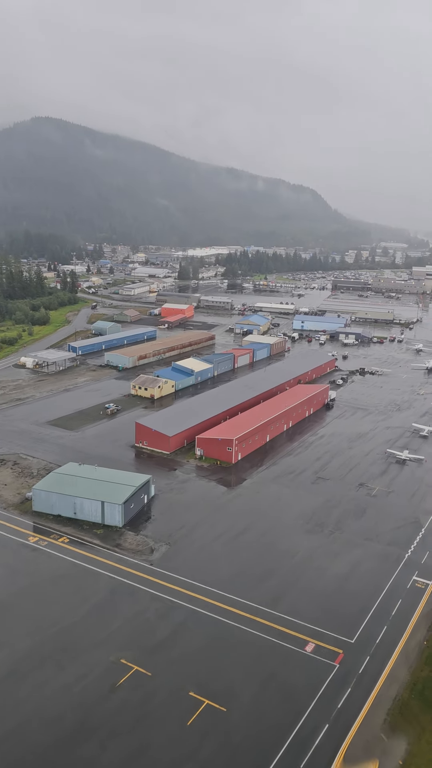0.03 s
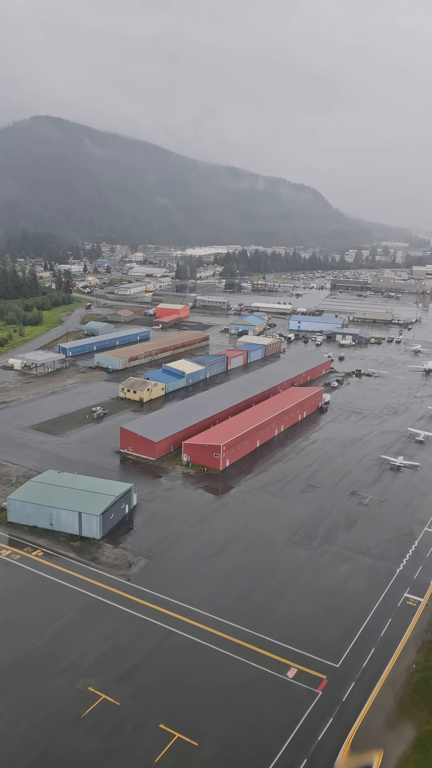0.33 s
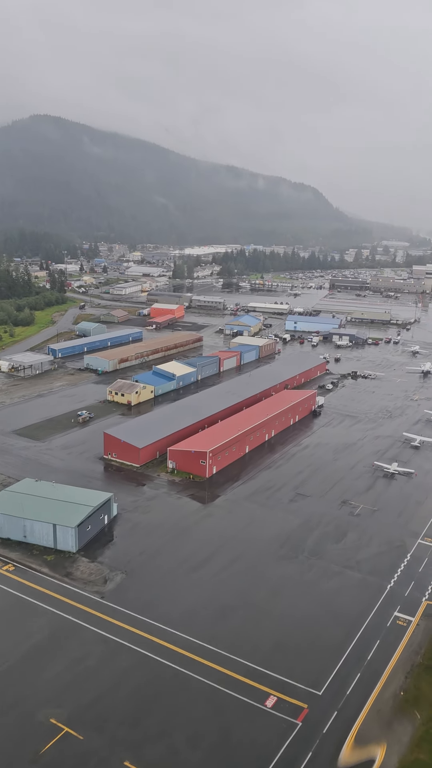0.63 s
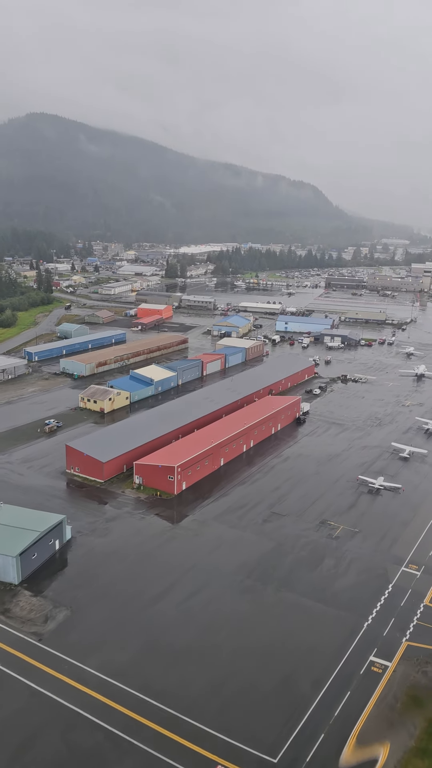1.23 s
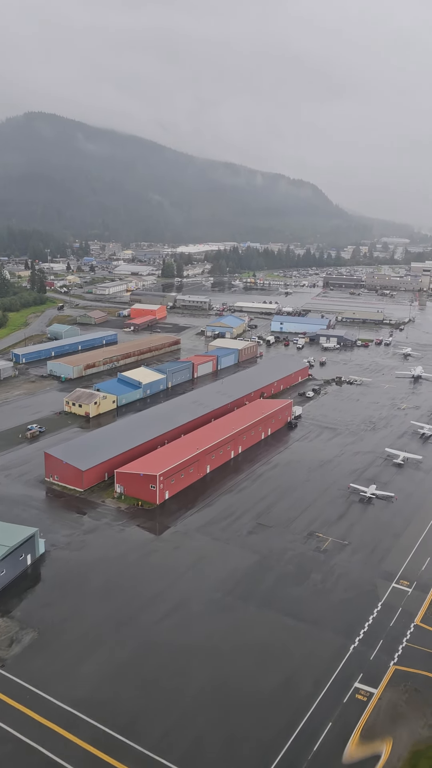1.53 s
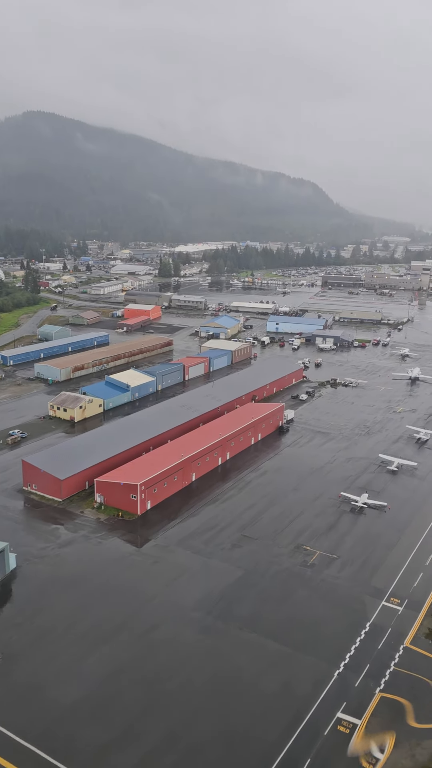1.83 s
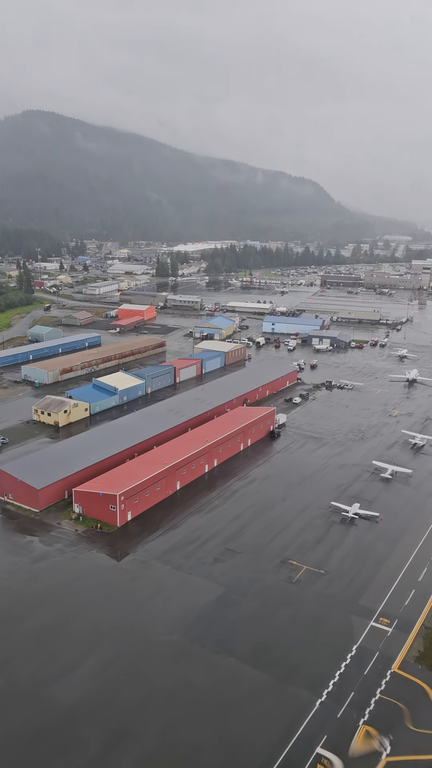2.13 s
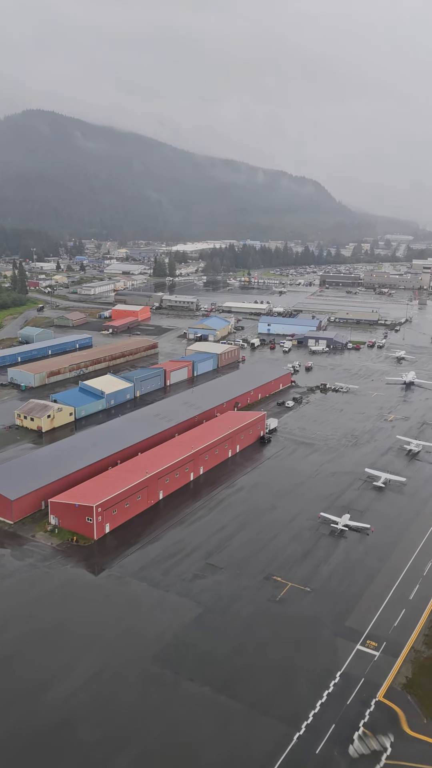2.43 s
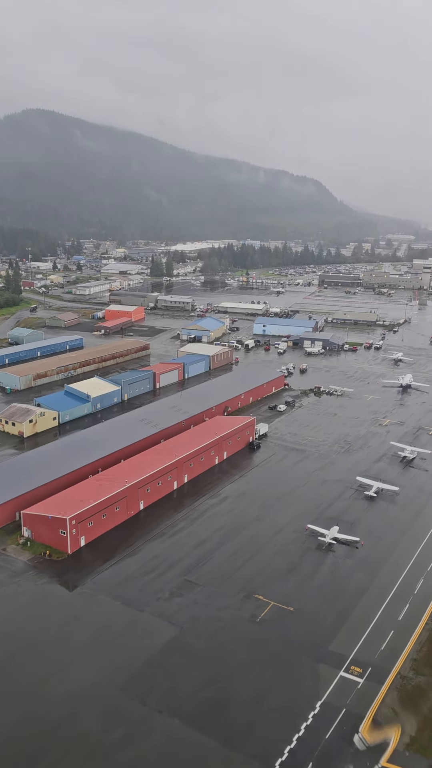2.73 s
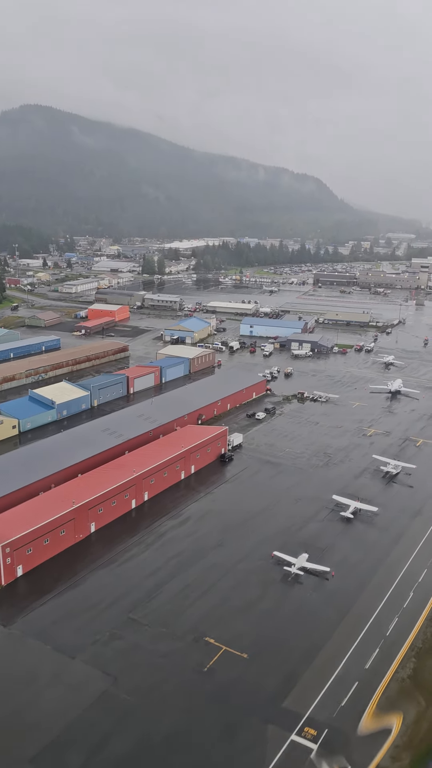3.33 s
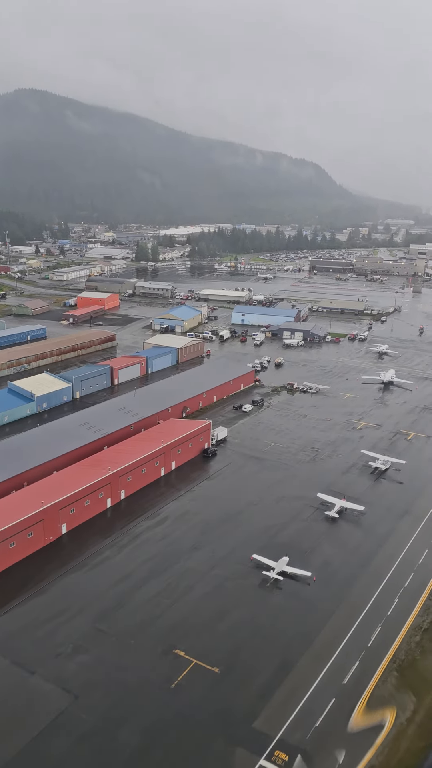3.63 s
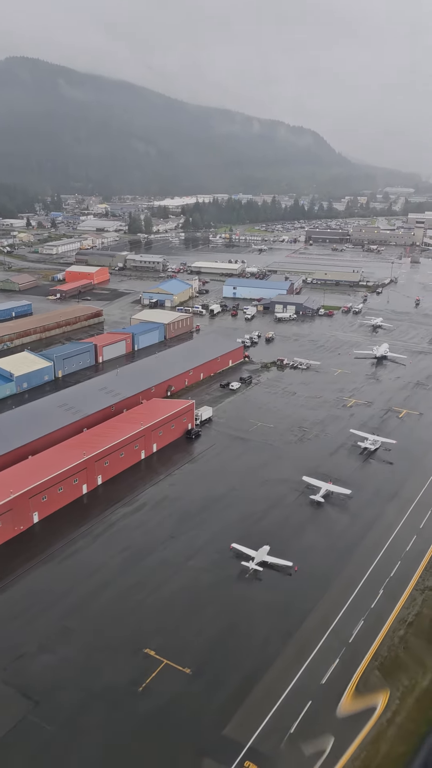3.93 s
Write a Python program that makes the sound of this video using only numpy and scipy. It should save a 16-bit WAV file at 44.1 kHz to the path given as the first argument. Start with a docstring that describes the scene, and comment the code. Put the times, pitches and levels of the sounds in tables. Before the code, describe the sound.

A helicopter heard from inside, its rotor throbbing and slapping over rumble, whine and hiss.

```python
"""Inside a helicopter cabin on a slow approach, a stereo pair of microphones at the seat.
All around, air rumbles on the hull and hisses through the cabin. The turbine whistles, the gearbox
sings and the tail rotor drones. Over it all the main rotor throbs: each passing blade slaps, now
softly, now hard, and cracks when it cuts a tip vortex."""
import sys
import numpy as np
from scipy import signal
from scipy.fft import rfft, irfft, next_fast_len
from scipy.io import wavfile
from scipy.ndimage import map_coordinates

SR = 44100
rng = np.random.default_rng(int(sys.argv[2]) if len(sys.argv) > 2 else 0)


def to_wav(s):
    """Save 16-bit WAV."""
    ch = np.atleast_2d(s).T  # columns
    pcm = np.round(np.clip(ch, -1, 1) * 32767)  # PCM
    wavfile.write(sys.argv[1], SR, pcm.astype(np.int16))


N = 176400

BLADE_HZ, FIRST_BLADE_S, TAIL_BLADE_HZ = 19.474, .0112, 68.82

# Airflow on the hull, in the cabin and at each microphone (frequency [Hz], relative density [dB])
HULL_RUMBLE = [(10, -28), (25, -22), (40, -1.5), (70, 0.5), (110, -2.5), (170, 0), (240, -4.5),
               (330, -14.5), (450, -19), (800, -31), (2000, -79)]
CABIN_AIR = [(100, 1), (280, -5), (420, -2.5), (700, -5.5), (1050, -7.5), (1320, -5.5), (1520, -9),
             (1750, -7.5), (2000, -13.5), (2230, -14), (2500, -30.5), (4000, -33)]
HISS_LEFT = [(1200, -24), (2400, -2.5), (3300, 4), (3900, 0.5), (4500, 2.5), (6600, -1.5), (7700, 2),
             (8350, 7.5), (8800, 3), (9750, 5.5), (10150, -1), (10700, -2), (11200, 1), (14500, 1),
             (15500, 3.5)]
HISS_RIGHT = [(1200, 1.5), (2400, -0.5), (3300, -1), (3900, 0), (4500, 2.5), (6000, 0.5), (7000, -10),
              (8300, -12.5), (9000, -9), (9800, -6), (10400, -2), (11500, 6), (12300, 0.5), (14500, 2.5),
              (15600, 2.5)]
# Likeness of the air noise at the two microphones (frequency [Hz], correlation [-1..1])
MIC_COHERENCE = [(200, 0.85), (500, 0.68), (1000, 0.28), (2500, 0.19)]
# Compressor speed (time [s], change [%])
COMPRESSOR_SPEED = [(0, -.6), (.3, -.22), (1.2, -.02), (1.5, .02), (2.0, -.15), (2.7, .36), (3.15, .36),
                    (3.6, 0), (4, -.1)]
# Turbine whistles, gear tones, and the main mesh with its shaft sidebands, all before their swells
# (frequency [Hz], left level [dB], right level [dB], flutter share of power [0..1])
TURBINE_TONES = [(8345, -42.5, -57.5, .45), (9860, -43, -50, .35)]
GEAR_TONES = [(648, -47, -51, .4), (700, -45, -49, .4), (908, -53, -60, .4), (1298, -41, -48, .45),
              (1514, -57, -52, .3), (1948.6, -47.5, -38, .03), (2235, -62, -52, .9), (2955, -55, -64, .8),
              (3246, -57, -53.5, .6), (3828, -53.5, -62, .7), (3900, -59, -55, .7), (4554, -51, -48.5, .65),
              (5561, -54, -54.5, .65), (6164, -58, -56, .7), (12118, -60, -56, .8)]
MESH_TONES = [(1688, -58, -47.5, .25), (1716, -40.5, -44, .08), (1744.5, -56, -43.5, .15),
              (1773, -58, -54, .4)]
# Swells of the cabin air, the gears and the main mesh (time [s], gain [dB])
AIR_SWELL = [(0, 0), (1.0, 1.5), (2.0, 0.9), (2.5, 2.2), (2.9, -0.5), (3.3, -1.5), (4, -1)]
GEAR_SWELL = [(0, 0), (1.2, 1), (2.6, 1), (3.1, -1.5), (4, -1.5)]
MESH_SWELL = [(0, -1.5), (.9, 3), (1.6, -1), (2.35, 5), (2.9, -2.5), (4, -5.5)]
# Tail rotor drone and main rotor throb (harmonic [x blade rate], level [dB])
TAIL_DRONE = [(1, -19.5), (2, -30), (3, -40.5), (4, -49.5)]
MAIN_THROB = [(1, -35), (2, -31.5), (3, -35.5), (4, -30), (5, -27), (6, -33), (7, -32.5), (9, -28),
              (11, -39), (13, -39.5), (14, -39), (21, -47.5), (26, -48)]
# Course of the slap's strength, and single vortex cracks (time [s], peak level [dB])
SLAP_LEVEL = [(0, -23.5), (.3, -17), (.6, -14), (.75, -16.5), (1.08, -20), (1.145, -13), (1.5, -15),
              (1.9, -21.5), (2.57, -24), (2.7, -13), (2.98, -9.5), (3.042, -13), (3.1, -13.5),
              (3.33, -11.5), (3.5, -16), (3.72, -15.5), (3.92, -7.5), (4, -17)]
VORTEX_CRACKS = [(0.064, -16.5), (.424, -20), (.527, -20), (.629, -17), (1.1411, -14), (1.194, -23),
                 (1.245, -21), (1.296, -22), (2.783, -17), (2.888, -15), (2.990, -14.5), (3.0414, -6),
                 (3.093, -30), (3.144, -16), (3.195, -15.5), (3.349, -15), (3.913, -22), (3.9645, -12.5)]
# Slap, crack and blade wake as heard from the seat (frequency [Hz], relative level [dB])
SLAP_COLOUR = [(30, -28), (110, -10.5), (190, -2), (245, 4), (290, 1.5), (330, -9.5), (400, -6.5),
               (460, -12.5), (520, -12.5), (800, -19), (1300, -45), (3000, -76)]
CRACK_COLOUR = [(100, -17), (350, -0.5), (650, 1.5), (950, -3), (1300, -16), (2200, -42), (6000, -80)]
WAKE_COLOUR = [(100, 2.5), (250, -4.5), (420, -5.5), (750, -1.5), (1100, -18), (2500, -58)]


def amp(db):
    """Decibels to gain."""
    return 10 ** (np.asarray(db) / 20)


def unit(x):
    """Scale to rms 1."""
    return x / np.sqrt(np.mean(x ** 2) + 1e-20)


def along(points, hz):
    """Read (frequency [Hz], value) points on a log axis."""
    f, v = np.transpose(points)
    return np.interp(np.log(hz + 1), np.log(f + 1), v)


def curve(rows):
    """Join (time [s], value) points, one value per sample."""
    return np.interp(np.arange(N) / SR, *np.transpose(rows))


def wobble(rate):
    """A smooth random curve, rate knots a second."""
    knots = rng.standard_normal(int(N * rate / SR) + 4)
    return map_coordinates(knots, [np.arange(N) * rate / SR])


def filtered(x, response):
    """Apply a frequency response to x."""
    size = next_fast_len(N + SR // 2)
    return irfft(rfft(x, size) * response(np.fft.rfftfreq(size, 1 / SR)), size)[..., :N]


def noise(spectrum):
    """Coloured noise of rms 1."""
    return unit(filtered(rng.standard_normal(N), lambda hz: amp(along(spectrum, hz))))


def wide_noise(spectrum):
    """Cabin noise, most alike at the two microphones in the bass."""
    def mid_and_side(hz):
        angle = np.arccos(np.clip(along(MIC_COHERENCE, hz), -1, 1)) / 2
        return amp(along(spectrum, hz)) * [np.cos(angle), np.sin(angle)]
    mid, side = filtered(rng.standard_normal((2, N)), mid_and_side)
    return unit(np.array([mid + side, mid - side]))


def from_left(x, lag_s=.00038):
    """Sound that reaches the left microphone first."""
    return filtered(x, lambda hz: np.exp(1j * np.pi * hz * lag_s * np.array([[1], [-1]])))


def pulses(times, peaks, colour, size=8192):
    """Causal pressure pulses of a given colour and peak."""
    cepstrum = irfft(np.log(amp(along(colour, np.fft.rfftfreq(size, 1 / SR)))))
    cepstrum[1:size // 2] *= 2  # fold to minimum phase for a sharp onset
    cepstrum[size // 2 + 1:] = 0
    shape = irfft(np.exp(rfft(cepstrum)))
    train = np.bincount(np.abs(np.round(times * SR)).astype(int), peaks, N)[:N]
    return signal.fftconvolve(train, shape / np.abs(shape).max())[:N]


def harmonics(hz, orders, waver_db):
    """Multiples of a blade rate, each wavering in level."""
    phase = 2 * np.pi * hz * np.arange(N) / SR
    return np.sqrt(2) * sum(
        amp(db + waver_db * wobble(5.02)) * np.sin(round(k) * phase + rng.uniform(0, 2 * np.pi))
        for k, db in orders)


def tones(rows, speed, flutter_rate):
    """Machine tones on one shaft; part of each is scattered into a narrow flutter."""
    shaft_time = np.cumsum(speed) / SR
    out = np.zeros((2, N))
    for hz, left_db, right_db, share in rows:
        carrier = np.exp(2j * np.pi * hz * shaft_time)
        for side, db in enumerate((left_db, right_db)):
            flutter = wobble(flutter_rate) + 1j * wobble(flutter_rate)
            envelope = np.sqrt(2 * (1 - share)) + np.sqrt(share) * flutter
            out[side] += amp(db) * np.real(carrier * 1j ** side * envelope)  # sides 90 degrees apart
    return out


def hull_rumble():
    """Air rumbles on the hull, a little more when the blades slap harder."""
    slap_db = curve(SLAP_LEVEL)
    level_db = -21.5 + 0.086 * (slap_db - slap_db.mean()) + 0.52 * wobble(5.92)
    mid, side = noise(HULL_RUMBLE), amp(-20) * noise(HULL_RUMBLE)
    return amp(level_db) * np.array([mid + side, mid - side])


def cabin_air():
    """Air rushes through the cabin, gently swelling and easing."""
    level_db = -31.5 + curve(AIR_SWELL) + 0.34 * wobble(8.3)
    return amp(level_db) * from_left(wide_noise(CABIN_AIR))


def air_hiss(ripple_db=1.3, ripple_width_hz=50):
    """Air hisses at each microphone, its spectrum rippled by cabin reflections."""
    hiss = np.array([noise(HISS_LEFT), noise(HISS_RIGHT)])
    for side, ripple in enumerate(ripple_db * rng.standard_normal((2, SR // 2))):
        hiss[side] = filtered(hiss[side], lambda hz: amp(map_coordinates(ripple, [hz / ripple_width_hz])))
    blade_chop_db = 0.38 * np.cos(2 * np.pi * BLADE_HZ * (np.arange(N) / SR - FIRST_BLADE_S))
    flicker_db = 0.67 * np.array([wobble(24.98), wobble(25.05)])
    return amp(-29 + blade_chop_db + flicker_db + 0.37 * curve(AIR_SWELL)) * hiss


def turbine():
    """Fuzzy whistles, louder on the left, follow the compressor's speed and swell at random."""
    speed = 1 + curve(COMPRESSOR_SPEED) / 100 + 0.00031 * wobble(12)
    swell_db = 1 + .9 * wobble(6.05)
    return amp(swell_db) * tones(TURBINE_TONES, speed, flutter_rate=70)


def gearbox():
    """Meshing teeth sing at governed speed; the main mesh swells and fades."""
    speed = 1 + 0.000491 * wobble(2.032)
    gears = amp(curve(GEAR_SWELL)) * tones(GEAR_TONES, speed, flutter_rate=55)
    mesh = amp(curve(MESH_SWELL)) * tones(MESH_TONES, speed, flutter_rate=25)
    return gears + mesh


def tail_rotor():
    """Back on the tail, the blades drone low and steady."""
    return harmonics(TAIL_BLADE_HZ, TAIL_DRONE, waver_db=0.8)


def blade_wake(rise_s=.0011, decay_s=.012):
    """Turbulence puffs behind each blade, louder when the slap is hard."""
    age = (np.arange(N) / SR - FIRST_BLADE_S) % (1 / BLADE_HZ)
    puff = (1 - np.exp(-age / rise_s)) * np.exp(-age / decay_s)
    return amp(-16 + 0.73 * curve(SLAP_LEVEL)) * puff * wide_noise(WAKE_COLOUR)


def vortex_cracks(echo_s=.01042, echo_db=-10.5):
    """A blade cuts a tip vortex; the crack arrives direct, then once more off the airframe."""
    times, peak_db = np.transpose(VORTEX_CRACKS)
    direct = pulses(times, amp(peak_db), CRACK_COLOUR)
    echo = pulses(times + echo_s, amp(peak_db + echo_db), CRACK_COLOUR)
    return direct + echo


def blade_slaps(scatter_db=1.0, jitter_s=.00016):
    """Each passing blade sends a pressure pulse into the cabin, slightly uneven in level and time."""
    times = np.arange(FIRST_BLADE_S, N / SR, 1 / BLADE_HZ)
    scatter, jitter = rng.standard_normal((2, len(times)))
    peak_db = np.interp(times, *np.transpose(SLAP_LEVEL)) + scatter_db * scatter
    return pulses(times + jitter_s * jitter, amp(peak_db), SLAP_COLOUR)


def main_rotor():
    """Close overhead, every blade gives a throb, a slap and a puff of wake; some crack."""
    blades = from_left(blade_slaps() + vortex_cracks() + blade_wake())
    return blades + harmonics(BLADE_HZ, MAIN_THROB, waver_db=1.2)


def scene():
    """Everything heard from the seat."""
    machinery = main_rotor() + tail_rotor() + gearbox() + turbine()
    return machinery + hull_rumble() + cabin_air() + air_hiss()


def record(dry, top_hz=15740):
    """The microphone channels pass nothing above their band limit."""
    return filtered(dry, lambda hz: hz < top_hz)


dry = scene()
out = record(dry)
to_wav(out)
```